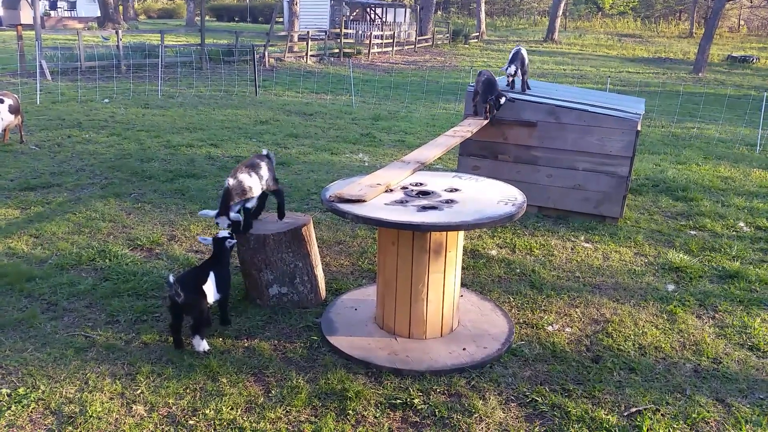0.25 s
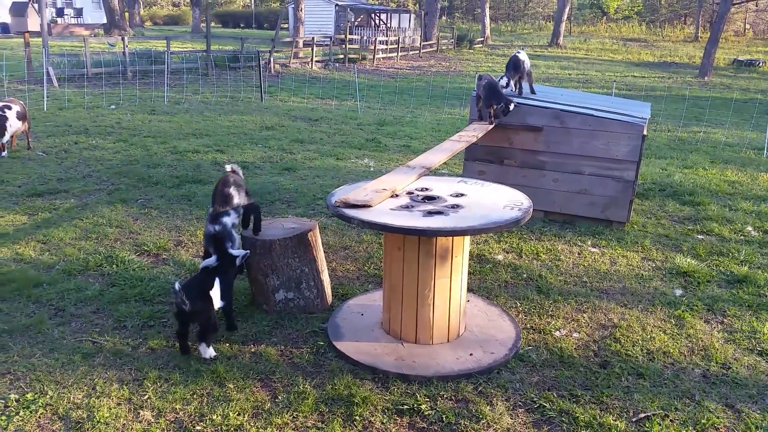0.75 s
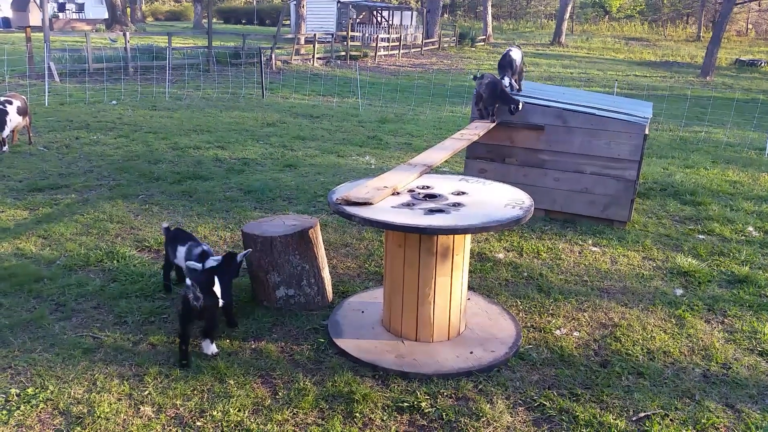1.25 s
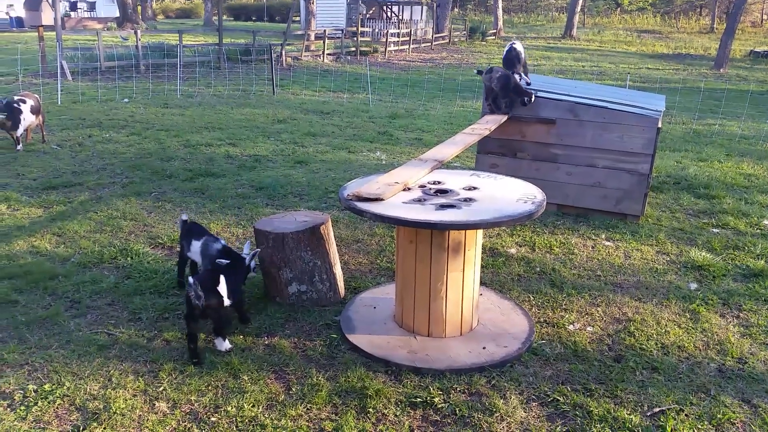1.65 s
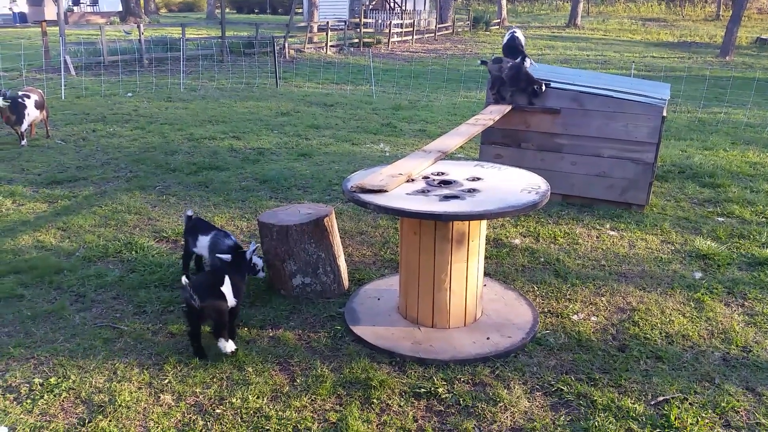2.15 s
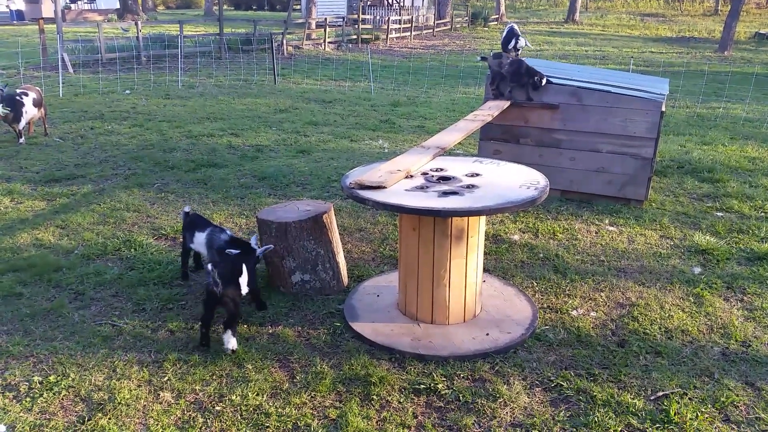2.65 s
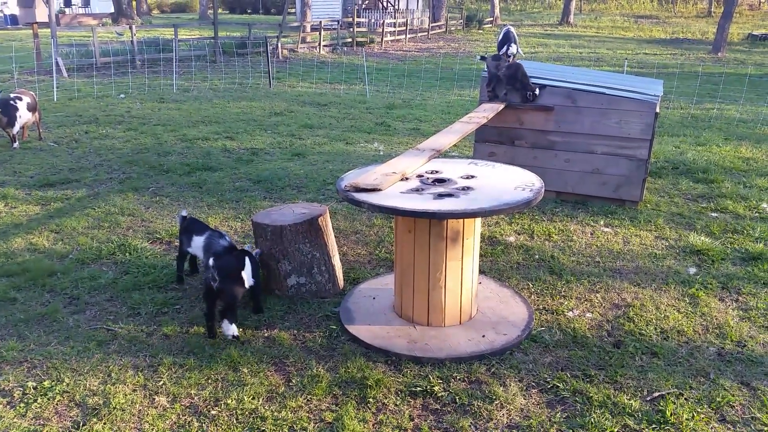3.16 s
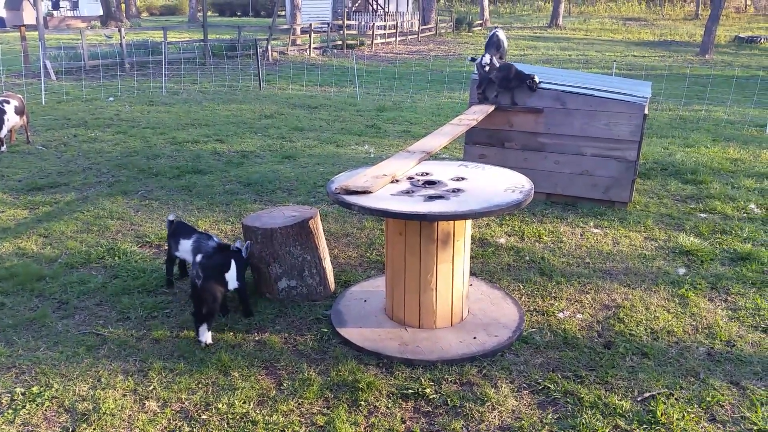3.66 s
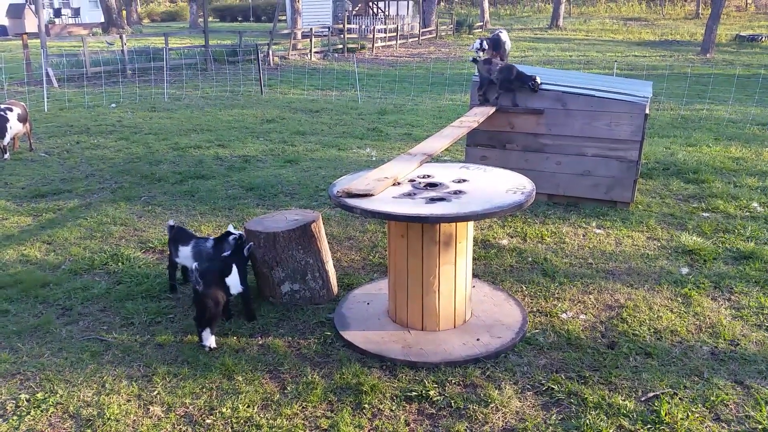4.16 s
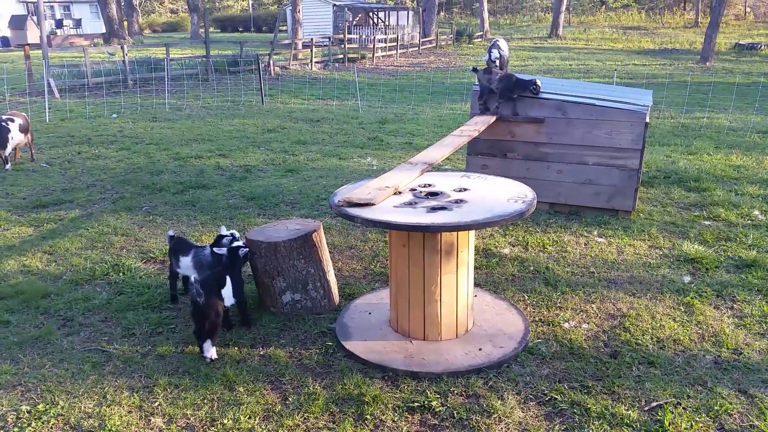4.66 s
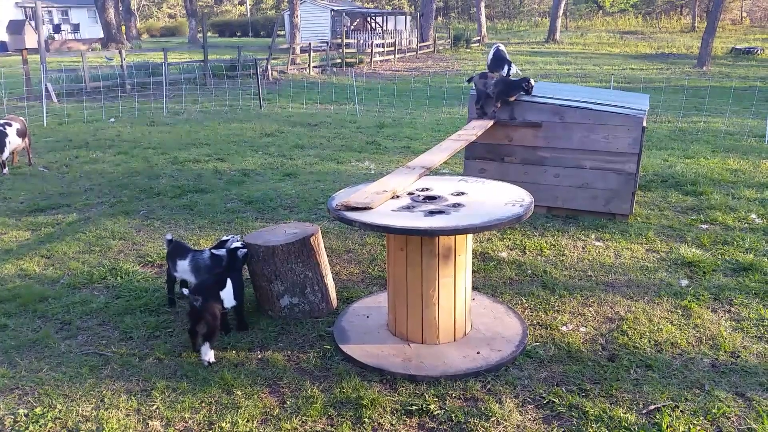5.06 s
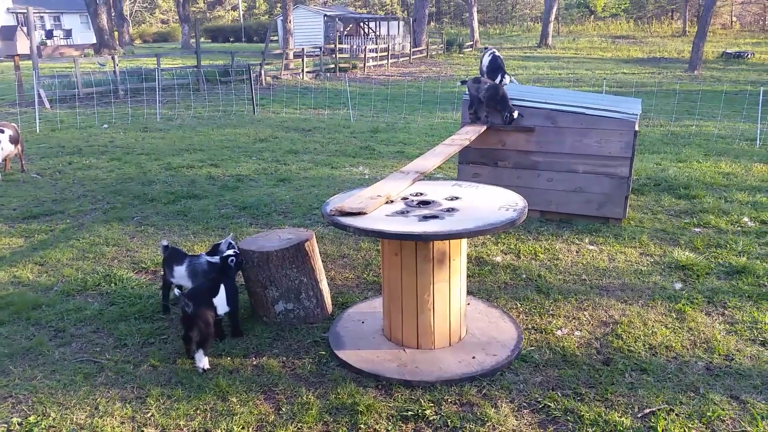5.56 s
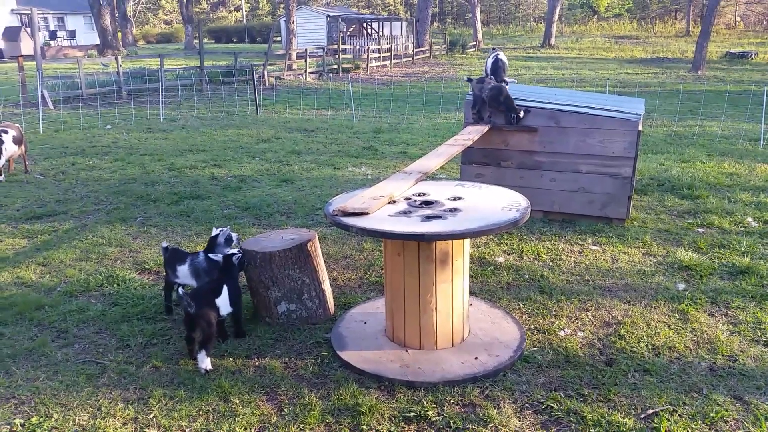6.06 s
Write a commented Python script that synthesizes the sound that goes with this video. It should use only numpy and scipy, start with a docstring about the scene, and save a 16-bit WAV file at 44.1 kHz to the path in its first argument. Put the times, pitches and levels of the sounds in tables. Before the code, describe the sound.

Light, dry hoof knocks on hollow wood come in uneven clusters with soft thuds and rustling grass, while small birds chirp faintly. A quiet middle leaves thin whistled phrases above a steady low engine rumble and microphone hiss. Near the end, several sparse scrapes and taps resume. The camera is handheld outdoors, some distance from the goats, and clicks briefly as fingers touch it.

```python
"""In a yard, young goats hop about a wooden play set, and birds sing over far traffic.
Hooves knock on planks: rough skids set tuned resonances ringing, with a thud and dry grit.
Feet scuff in the grass as flickering noise, and fingers tick on the hand-held camera as short bursts.
The birds are gliding, slightly grainy sine tones. Traffic is low noise round a wavering hum.
Scattered echoes follow the hooves, birds and ticks; a steady microphone hiss lies below."""
import sys
import numpy as np
from scipy import signal
from scipy.fft import rfft, irfft
from scipy.io import wavfile

SR = 44100
rng = np.random.default_rng(int(sys.argv[2]) if len(sys.argv) > 2 else 0)


def put_to_file(sound):
    """Save the sound as 16-bit audio at rate SR, in the file named by the first command-line argument."""
    columns = np.atleast_2d(sound).T  # one column per channel
    safe = np.clip(columns, -1, 1)
    whole_steps = np.round(safe * 32767)
    wavfile.write(sys.argv[1], SR, whole_steps.astype(np.int16))


N = 278271

# Hooves on wood. Each row: start in seconds, level in dB, pitch of the struck spot in Hz,
# left minus right in dB, thud level in dB, skid time in seconds, hardness in dB.
HOOVES = [(0.330, -46.5, 1060, -12, -60, 0.014, -18.5), (.349, -44.5, 1280, -4, -61.5, 0.0125, -13),
          (0.344, -43, 460, -1, -60, 0.0054, -22), (.385, -51.5, 1040, -8, -63, 0.015, -12),
          (0.416, -53, 880, 5, -48, 0.0089, -16), (0.624, -44.5, 550, 2, -46, 0.0088, -2),
          (0.819, -52, 870, 4.5, -50, 0.022, 3), (1.09, -45, 870, 5, -66, 0.0091, -5),
          (1.134, -48, 630, 0, -33.5, 0.0089, -2), (1.426, -47.5, 870, 3, -63, 0.0054, 5),
          (1.484, -50, 870, 2, -60, 0.0072, -8), (1.55, -40, 950, 3.5, -51, 0.0049, -1),
          (1.592, -31, 630, -2.5, -44, 0.007, 6.5), (1.757, -38.5, 712, -0.5, -37.5, 0.0072, 0),
          (1.852, -37.5, 813, 0, -41.5, 0.0084, 1.5), (2.207, -55.5, 467, -2, -41, 0.0095, -14),
          (5.032, -42, 1024, 1, -40.5, 0.017, 1), (5.377, -49, 855, 2, -67.5, 0.0041, -3),
          (5.746, -43, 794, 1, -46, 0.026, -7), (5.933, -48.5, 900, 7, -55, 0.041, 3.5),
          (6.212, -48.5, 946, 4, -55, 0.0055, 5.5)]
# Resonances of the planks. Each row: pitch in Hz, relative level in dB.
PLANKS = [(470, 1.5), (630, 6.5), (740, 4.5), (870, 7.5), (1020, -7.5), (1210, 10), (1550, 7), (2030, 7.5),
          (2550, 8)]
WOOD_T60_S, WOOD_AT_HZ = 0.052, 700  # time to fade by 60 dB at this pitch; higher pitches fade sooner
TREBLE_FROM_HZ = 1800  # hardness changes the plank tones above this
THUD_HZ, THUD_T60_S = 185, 0.09  # each thud strays a little from this pitch

# Level of the shuffling feet. Each row: time in seconds, level in dB.
SHUFFLE_LEVEL = [(0.0, -61), (0.44, -67), (0.97, -62.5), (1.37, -61.5), (1.7, -55.5), (1.9, -61.5),
                 (2.34, -71), (3.06, -69), (3.46, -67.5), (4.66, -70), (5.18, -62), (5.54, -69.5),
                 (5.94, -67), (6.31, -72)]
# Colour of the shuffle. Each row: frequency in Hz, relative level in dB per Hz.
SHUFFLE_COLOUR = [(500, 2.5), (1000, -33), (1300, -4.5), (2000, 5.5), (3500, -1), (5000, -6), (6000, -13)]
# Faint rings in the shuffle. Each row: pitch in Hz, width of one resonance in Hz, relative level in dB.
SHUFFLE_RINGS = [(1429, 79, -2), (1735, 270, 0.5)]
RINGS_ON_S, RINGS_OFF_S, RINGS_FADE_S = 0.7, 1.82, 0.025
RINGS_OUT_DB, RINGS_REST_DB = -4, -12  # added to the rings while they stand out, and otherwise
# Colour of the grass rustle. Each row: frequency in Hz, relative level in dB per Hz.
RUSTLE_COLOUR = [(5600, -11.5), (6600, -1), (7500, 1), (9500, -3.5), (11500, -1.5), (15000, -10.5)]
# Gusts of rustle. Each row: middle in seconds, half length in seconds, level in dB.
RUSTLE_GUSTS = [(0.367, 0.053, -63), (0.8, 0.031, -65), (1.216, 0.047, -71.5), (1.517, 0.016, -59),
                (2.2, 0.095, -69), (3.331, 0.067, -69.5), (3.578, 0.0089, -64), (5.048, 0.016, -72),
                (5.73, 0.039, -67)]
RUSTLE_DB, RUSTLE_FOLLOWS = -70.5, 0.8  # level when the shuffle is at -65 dB; share of its swing

# Finger ticks. Each row: start in seconds, peak in dB, pitch in Hz, 60 dB fade time in seconds,
# left minus right in dB, gain of the bump in dB.
TICKS = [(0.2202, -30, 7400, 0.018, 12, -61.5), (0.221, -30.5, 8050, 0.0043, -18, -45),
         (0.2279, -46, 7100, 0.04, 10.5, -34), (0.224, -44, 8600, 0.071, 5, -60),
         (0.382, -46, 9000, 0.013, 2, -47), (.7030, -55, 7640, 0.028, 9, -76.5),
         (0.837, -45, 11000, 0.011, -2, -66), (1.8189, -29.5, 9800, 0.00063, 14.5, -38.5),
         (5.1294, -35.5, 8400, 0.0071, -1, -23.5), (5.7986, -43.5, 9800, 0.006, -21.5, -44)]
# Resonances of the camera case. Each row: pitch in Hz, relative level in dB, 60 dB fade time in seconds.
CASE = [(260, 1.5, 0.014), (670, 7.5, 0.0019), (3910, 3.5, 0.0015)]

# Notes of a phrase that falls in pitch. Each row: seconds into the phrase, length in seconds,
# start pitch in Hz, end pitch in Hz, bend (above 0 glides early, below 0 late), relative level in dB.
FALL_NOTES = [(.01, 0.023, 5100, 4200, 0.5, -4.5), (.036, .032, 4300, 3880, 5.58, -11.5),
              (.068, 0.044, 3800, 3260, 0.5, -5.5), (.112, .042, 3302, 1958, 3.5, -2)]
# Calls of that phrase. Each row: start in seconds, level in dB, stretch in time (1 is none).
FALL_CALLS = [(0.397, -65, 1.05), (0.958, -54, 1.04), (1.348, -51, 1.01), (1.691, -50, 0.87)]
# Notes of a phrase that mostly climbs. Each row: seconds into the phrase, length in seconds,
# start pitch in Hz, end pitch in Hz, bend (as above), relative level in dB.
CLIMB_NOTES = [(.002, 0.026, 2543, 2470, -1.5, 0), (.03, 0.03, 2170, 2400, -1.59, 7),
               (.11, 0.0294, 1933, 2770, 5.5, 6), (.146, .02, 2790, 2820, -2, -12.5),
               (.168, 0.027, 2970, 3010, 1.5, -5.5)]
# Calls of that phrase. Each row: start in seconds, level in dB.
CLIMB_CALLS = [(3.688, -68), (3.919, -66), (4.151, -65), (4.381, -63.5), (4.612, -63.5), (4.852, -64),
               (5.108, -64)]
GLIDE_LOSS_DB = 0.2  # climbing-phrase notes are this much softer per kHz/s of glide
# Level whistles with one dip in pitch. Each row: start in seconds, level in dB, held pitch in Hz.
DIPS = [(2.861, -68, 2707), (3.067, -66, 2614), (3.278, -63, 2606), (3.486, -62.5, 2612)]
DIP_DEPTH_HZ, DIP_AT_S, DIP_DOWN_S, DIP_UP_S = 508, 0.062, 0.0306, 0.0131
DIP_LENGTH_S, DIP_FADE_DB = 0.16, 2  # they weaken by this much from start to end
# Thin whistles that hook up to a level pitch. Each row: start in seconds, length in seconds, level in dB.
HOOKS = [(3.768, 0.125, -74.5), (4.11, 0.1, -80), (4.686, 0.15, -78.5)]
HOOK_TOP_HZ, HOOK_RISE_HZ, HOOK_RISE_S = 7500, 1097, 0.036
# Single whistled notes. Each row: start in seconds, length in seconds, start, middle and end
# pitch in Hz, level in dB.
SINGLE_NOTES = [(0, 0.19, 10070, 10900, 9700, -55.5), (.0, 0.283, 2427, 2583, 2450, -68.5),
                (0.35, 0.014, 3940, 4130, 4230, -58), (6.177, 0.029, 8040, 7750, 7370, -71)]
SINGLE_FADE_DB, WAVER = 10, 0.004  # fade along the note; random share of its pitch
# Quick rising chips. Each row: start in seconds, start pitch in Hz, level in dB.
CHIPS = [(0.134, 6740, -63), (4.005, 6400, -60), (4.845, 7700, -68.5), (5.333, 6600, -53.5)]
CHIP_S, CHIP_RISE_HZ = 0.0092, 1510
CLEAR, HUSKY, GRAIN_HZ = 0.15, 0.4, 400  # roughness of two kinds of voice; width of the grainy halo
FLUTTER_DB, FLUTTER_PER_S = 3, 50
SHARE = np.linspace(0, 1, 40)  # points along any bird note, from start to end
TAPER_DB = -3 * (2 * SHARE - 1) ** 2  # softer at both ends than in the middle

ECHO_DB, ECHO_T60_S, ECHO_GAP_S = -4.5, 0.62, 0.0092  # scatter from sheds and trees

# Level of the far rumble. Each row: time in seconds, level in dB.
RUMBLE_LEVEL = [(0.0, -46.5), (.5, -50), (1.0, -47), (1.9, -46), (2.35, -52), (3.3, -51), (3.75, -46.5),
                (4.08, -51.5), (5.6, -51.5), (6.31, -55.5)]
# Colour of the rumble. Each row: frequency in Hz, relative level in dB per Hz.
RUMBLE_COLOUR = [(18, -28), (30, -25.5), (54, -6.5), (124, 0), (152, -5), (167, -12), (202, -15),
                 (310, -24), (1300, -32), (1690, -81)]
HUM_HZ, HUM_WIDTH_HZ, HUM_DB = 142.82, 8.1, -11  # level relative to the low noise
# Colour of the microphone hiss. Each row: frequency in Hz, relative level in dB per Hz.
HISS_COLOUR = [(300, 13), (1500, 5), (2200, -12), (4000, 0.5), (5900, -7.5), (7000, -6.5), (10000, -6),
               (15000, 0)]
HISS_DB = -63
# How alike the ears are in all steady noises. Each row: frequency in Hz, likeness (1 is the same).
LIKENESS = [(60, 1), (180, 0.85), (550, 0.61), (1650, -0.36), (4970, -0.04), (15000, -0.092)]
# Balance of all steady noises. Each row: frequency in Hz, left minus right in dB.
LEAN = [(60, -3.5), (240, -2), (950, -0.5), (3770, -0.5), (15000, -0.5)]
CUTOFF_HZ = 15850


def amp(db):
    """Turns decibels into a gain."""
    return 10 ** (np.asarray(db) / 20)


def rms_one(x):
    """Scales a sound to an average power of 1."""
    return x / np.sqrt(np.mean(x ** 2) + 1e-20)


def in_time(rows):
    """Draws straight lines between the points of a level table, sample by sample."""
    s, level = np.transpose(rows)
    return np.interp(np.arange(N) / SR, s, level)


def at_hz(points, hz):
    """Reads a frequency table between its points, on a logarithmic pitch scale."""
    table = np.array(points)
    return np.interp(np.log(hz), np.log(table[:, 0]), table[:, 1])


def drift(rate):
    """Makes a smoothed random curve with spread 1; a higher rate per second moves faster."""
    r = np.exp(-80 * np.pi * rate / SR)  # one step is 40 samples
    steps = rng.standard_normal(N // 40 + 2002)
    slow = signal.lfilter([1], [1, -2 * r, r * r], steps)[2000:]
    return np.interp(np.arange(N) / 40, np.arange(len(slow)), rms_one(slow - slow.mean()))


def ring(x, hz, t60):
    """Drives a resonance: one unit click starts a dying sine whose height begins at 1."""
    r, w = amp(-60 / (t60 * SR)), 2 * np.pi * hz / SR
    return signal.lfilter([0, np.sin(w)], [1, -2 * r * np.cos(w), r * r], x)


def band_pass(x, low_hz, high_hz):
    """Keeps the sound between two frequencies."""
    return signal.sosfilt(signal.butter(2, [low_hz, high_hz], "band", fs=SR, output="sos"), x)


def narrow_noise(hz, width_hz):
    """Sends noise twice through one resonance, which leaves a wavering tone."""
    t60 = np.log(1000) / (np.pi * width_hz)
    once = ring(rng.standard_normal(N + SR), hz, t60)
    return rms_one(ring(once, hz, t60)[SR:])  # skip the build-up


def coloured(spectrum, flicker_db=0., rate=10.):
    """Shapes stereo noise to a colour, mixes shared and opposite parts, and flickers both ears together."""
    hz = np.maximum(np.fft.rfftfreq(N, 1 / SR), 1)
    alike = np.clip(at_hz(LIKENESS, hz), -1, 1)
    mid, side = rfft(rng.standard_normal((2, N)))
    ears = np.sqrt(1 + alike) * mid + np.sqrt(1 - alike) * side * [[1], [-1]]
    colour_db = at_hz([(1, -107)] + list(spectrum), hz)  # little is left in the deepest bass
    ears *= amp(colour_db + at_hz(LEAN, hz) * [[.5], [-.5]])
    return rms_one(irfft(ears, N) * amp(flicker_db * drift(rate)))


def add(out, sound, s, pan_db, lag=0, flip=1):
    """Lays a sound into both channels; the right one can lag by some samples and be scaled or inverted."""
    start = round(s * SR)
    gains = amp([pan_db / 2, -pan_db / 2]) * [1, flip]
    for channel, first, gain in zip(out, (start, start + lag), gains):
        room = len(channel[first:first + len(sound)])
        channel[first:first + room] += gain * sound[:room]


def hooves():
    """An uneven skid drives the planks, most of all near the struck pitch; a dull thud and dry grit join in."""
    out, t = np.zeros((2, N)), np.arange(SR // 4) / SR
    for s, db, spot_hz, pan_db, thud_db, skid, hard_db in HOOVES:
        grit = rng.standard_normal((len(PLANKS), len(t)))
        luck = rng.standard_normal((len(PLANKS), 2))
        contact = np.sqrt(t / skid) * np.exp(-(t / skid) ** 2)
        pushes = grit * contact
        wood = 0
        for (hz, mode_db), (chance, detune), push in zip(PLANKS, luck, pushes):
            hz = hz * (1 + 0.0189 * detune)  # each knock shifts every plank tone slightly at random
            # a brief blow bounces in step with the plank
            in_step = 0.00057 / skid * contact * np.sin(2 * np.pi * hz * t)
            mode = ring(push + in_step, hz, WOOD_T60_S * WOOD_AT_HZ / hz)
            away_db = min(60 * abs(np.log2(hz / spot_hz)), 17)  # modes far from the spot are softer
            level_db = mode_db + 2 * chance - away_db + hard_db * (hz > TREBLE_FROM_HZ)
            wood = wood + amp(level_db) * mode / abs(mode).max()
        thud = np.sin(2 * np.pi * THUD_HZ * (1 + 0.067 * luck[0, 0]) * t)
        thud *= amp(-60 * t / THUD_T60_S) * np.minimum(t / 0.00132, 1)
        scrape = band_pass(pushes[0], 0.26 * spot_hz, 2 * spot_hz)
        scrape += amp(hard_db) * band_pass(pushes[2], TREBLE_FROM_HZ, 3000)
        scrape += amp(hard_db / 2) * band_pass(pushes[1], 6800, 9500)
        knock = wood / abs(wood).max() + 12 * skid * scrape
        add(out, amp(db) * knock + amp(thud_db) * thud, s, pan_db)
    return out


def scuffing():
    """Dragging feet make a shuffle with two faint rings and a brighter, jerkier rustle that comes in gusts."""
    t = np.arange(N) / SR
    shuffle_db = in_time(SHUFFLE_LEVEL)
    rings = sum(amp(db) * narrow_noise(hz, width) for hz, width, db in SHUFFLE_RINGS)
    standing = np.clip(np.minimum(t - RINGS_ON_S, RINGS_OFF_S - t) / RINGS_FADE_S, 0, 1)
    rings_db = RINGS_REST_DB + (RINGS_OUT_DB - RINGS_REST_DB) * standing
    brush = coloured(SHUFFLE_COLOUR, flicker_db=1.5, rate=12.)
    shuffle = amp(shuffle_db) * (brush + amp(rings_db) * rings)
    power = amp(RUSTLE_DB + RUSTLE_FOLLOWS * (shuffle_db + 65)) ** 2
    for s, half, db in RUSTLE_GUSTS:
        power = power + amp(db) ** 2 * np.exp(-((t - s) / half) ** 2)
    return shuffle + np.sqrt(power) * coloured(RUSTLE_COLOUR, flicker_db=2.5, rate=25.)


def ticks():
    """Each tick is a bright burst and a blunt bump of the case, which pushes the two microphones opposite ways."""
    out, t = np.zeros((2, N)), np.arange(SR // 10) / SR
    press = np.exp(-(t / .00006) ** 2) / 2
    bump = sum(amp(db) * ring(press, hz, t60) for hz, db, t60 in CASE)
    bump = signal.lfilter(*signal.butter(1, 220, "high", fs=SR), bump)  # too brief to move the deep bass
    for s, db, hz, t60, pan_db, bump_db in TICKS:
        burst = rng.standard_normal(len(t)) * amp(-60 * t / t60) * np.minimum(20 * t / t60, 1)
        broad = band_pass(burst, 0.78 * hz, 1.27 * hz)
        bright = 0.13 * ring(burst, hz, 0.54 * t60) + broad
        add(out, amp(db) * bright / abs(bright).max(), s, pan_db, lag=1)
        add(out, amp(bump_db) * bump, s, pan_db, flip=-0.26)
    return out


def whistle(times, pitch_hz, level_db, rough):
    """A sine follows a pitch and level shape; slow noise shakes its loudness and spreads a grainy halo."""
    t = np.arange(round(times[-1] * SR)) / SR
    fade = np.clip(np.minimum(t, times[-1] - t) / 0.00084, 0, 1)
    low_pass = signal.butter(2, GRAIN_HZ, fs=SR, output="sos")
    grain = rms_one(signal.sosfilt(low_pass, rng.standard_normal(SR // 2)))[-len(t):]
    tone = np.sin(2 * np.pi * np.cumsum(np.interp(t, times, pitch_hz)) / SR)
    return fade * (1 + rough * grain) * amp(np.interp(t, times, level_db)) * tone


def sing_phrase(out, notes, call, rough, loss_db):
    """One call sings its notes in turn as bent glides, each a little off pitch by chance."""
    s, db, *stretch = call
    stretch = np.prod(stretch)  # 1 when the row gives none
    for at, length, start_hz, end_hz, bend, note_db in notes:
        glide = np.expm1(-bend * SHARE) / np.expm1(-bend)
        hz = (start_hz + (end_hz - start_hz) * glide) * rng.normal(1, 0.0083)
        speed = abs(np.gradient(hz, SHARE * length)) / 1000  # kHz per second
        level_db = db + note_db + TAPER_DB - loss_db * speed
        add(out, whistle(SHARE * length * stretch, hz, level_db, rough), s + at * stretch, 1.5, lag=3)


def sing_dips(out):
    """A level whistle slides into one dip, then curves back up."""
    t = SHARE * DIP_LENGTH_S
    down = np.maximum(1 - (DIP_AT_S - t) / DIP_DOWN_S, 0) ** 1.25
    up = np.exp(-(abs(t - DIP_AT_S) / DIP_UP_S) ** 1.23)
    dip = np.where(t < DIP_AT_S, down, up)
    for s, db, hold_hz in DIPS:
        level_db = db + DIP_FADE_DB * (1 - SHARE) + TAPER_DB / 2
        add(out, whistle(t, hold_hz - DIP_DEPTH_HZ * dip, level_db, CLEAR), s, 1.5, lag=3)


def sing_short_notes(out):
    """Hooks ease up to a top pitch, single notes bend and waver as they fade, and chips rise straight."""
    for s, length, db in HOOKS:
        hz = HOOK_TOP_HZ - HOOK_RISE_HZ * np.exp(-SHARE * length / HOOK_RISE_S)
        add(out, whistle(SHARE * length, hz, db + TAPER_DB, HUSKY), s, 2.5, lag=1)
    for s, length, *three_hz, db in SINGLE_NOTES:
        arc_hz = np.polyval(np.polyfit([0, .5, 1], three_hz, 2), SHARE)
        hz = arc_hz * rng.normal(1, WAVER, SHARE.size)
        level_db = db + TAPER_DB - SINGLE_FADE_DB * SHARE ** 2
        add(out, whistle(SHARE * length, hz, level_db, HUSKY), s, 2.5, lag=1)
    for s, start_hz, db in CHIPS:
        hz = start_hz + CHIP_RISE_HZ * SHARE
        add(out, whistle(SHARE * CHIP_S, hz, db + TAPER_DB, HUSKY), s, 2.5, lag=1)


def birds():
    """Phrases and single notes come from a little to the left; moving air makes them flutter in each ear."""
    out = np.zeros((2, N))
    for call in FALL_CALLS:
        sing_phrase(out, FALL_NOTES, call, HUSKY, 0)
    for call in CLIMB_CALLS:
        sing_phrase(out, CLIMB_NOTES, call, CLEAR, GLIDE_LOSS_DB)
    sing_dips(out)
    sing_short_notes(out)
    return out * amp(FLUTTER_DB * np.array([drift(FLUTTER_PER_S), drift(FLUTTER_PER_S)]))


def echoes(x):
    """Scattered sound forms a dense, dull tail of fading noise, different in each ear."""
    t = np.arange(SR // 2) / SR
    tails = signal.lfilter([.2], [1, -.8], rng.standard_normal((2, len(t))))
    tails = tails * amp(-60 * t / ECHO_T60_S) * (t > ECHO_GAP_S)
    tails /= np.sqrt(np.sum(tails ** 2, axis=1, keepdims=True))
    return amp(ECHO_DB) * signal.fftconvolve(x, tails, axes=1)[:, :N]


def rumble():
    """Far engines blend into low noise and one wavering hum, which is stronger on the right."""
    hum = amp(HUM_DB) * narrow_noise(HUM_HZ, HUM_WIDTH_HZ) * amp([[-1.5], [1.5]])
    return amp(in_time(RUMBLE_LEVEL)) * (coloured(RUMBLE_COLOUR) + hum)


def hiss():
    """The microphones add steady coloured noise."""
    return amp(HISS_DB) * coloured(HISS_COLOUR)


def scene():
    """Adds up the yard, sending a share of the hooves, birds and ticks into the echoes."""
    knocks, song, touches = hooves(), birds(), ticks()
    scattered = echoes(0.34 * knocks + 0.73 * song + 0.14 * touches)
    return knocks + scuffing() + touches + song + scattered + rumble() + hiss()


def record(dry):
    """A steep filter cuts the highest treble."""
    return signal.sosfilt(signal.ellip(14, .3, 45, CUTOFF_HZ, fs=SR, output="sos"), dry)


dry = scene()
out = record(dry)
put_to_file(out)
```